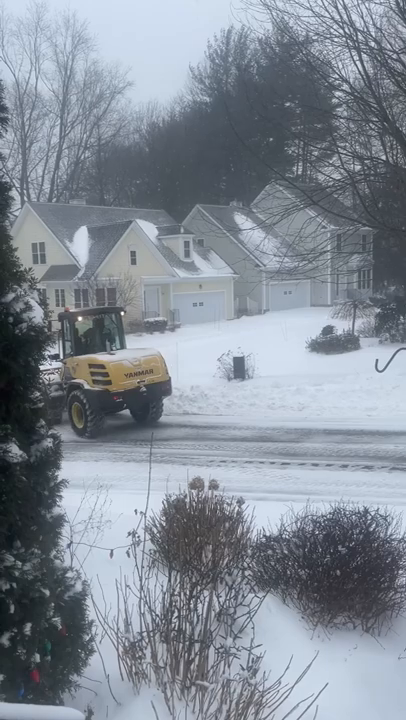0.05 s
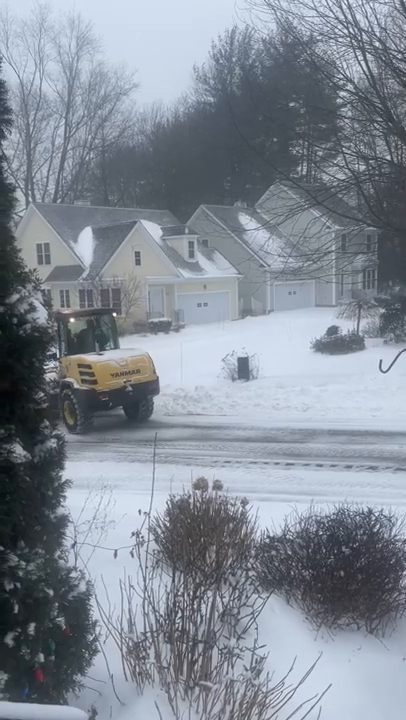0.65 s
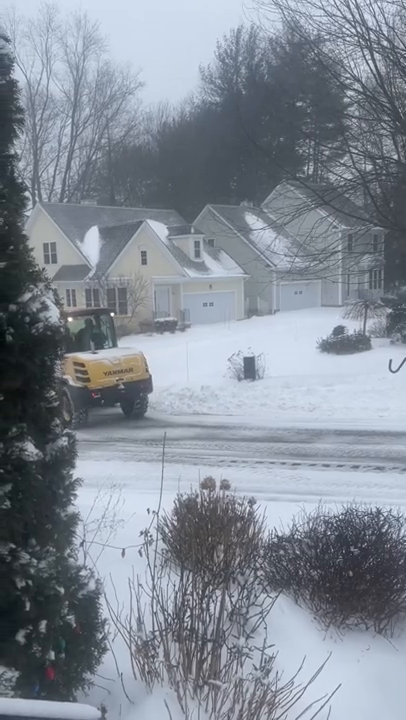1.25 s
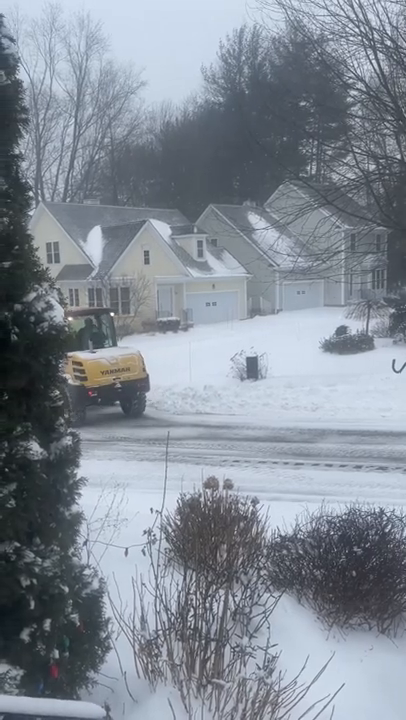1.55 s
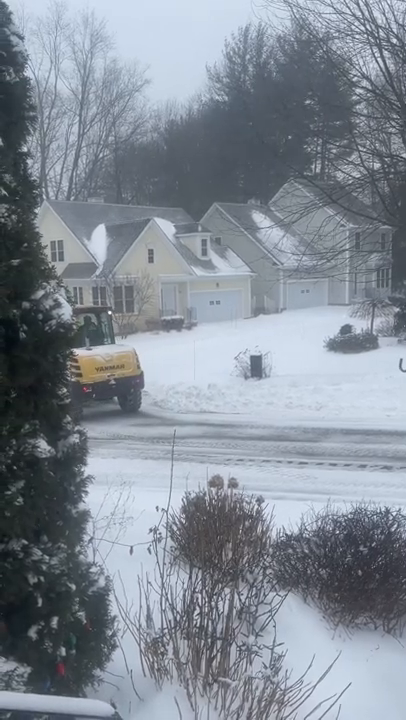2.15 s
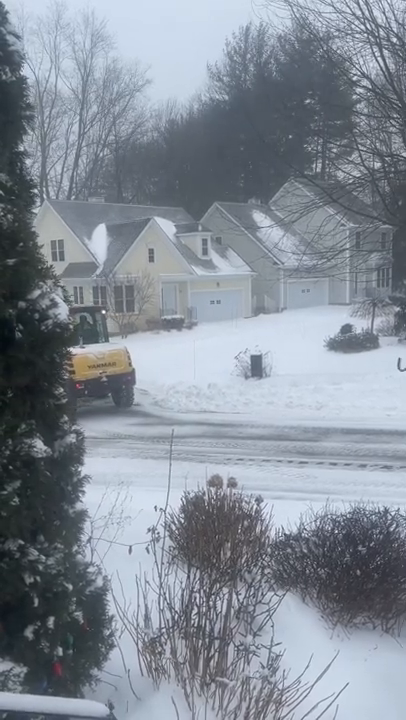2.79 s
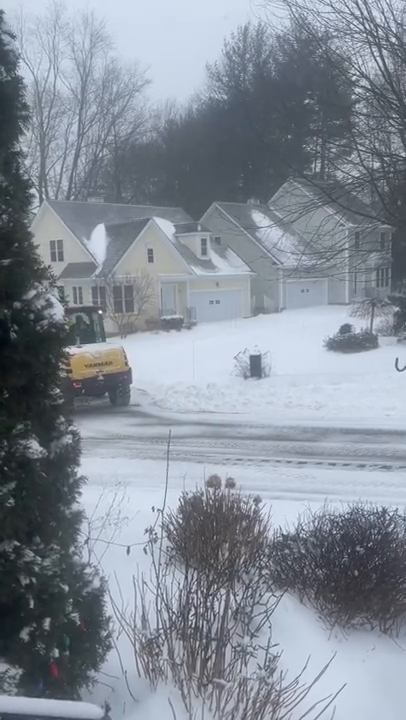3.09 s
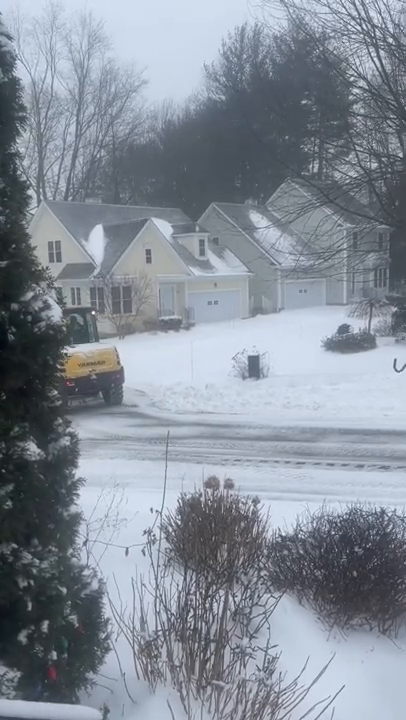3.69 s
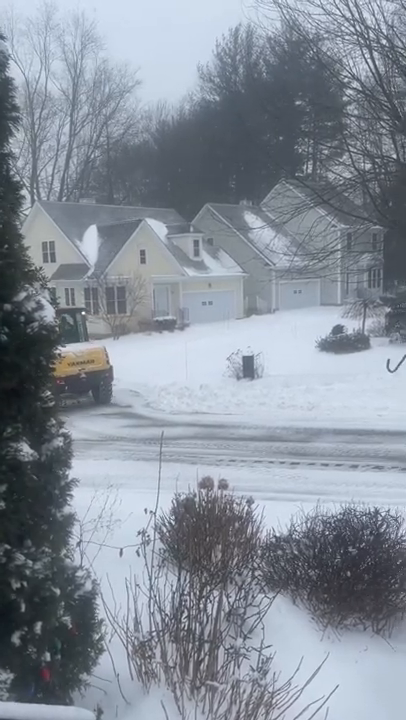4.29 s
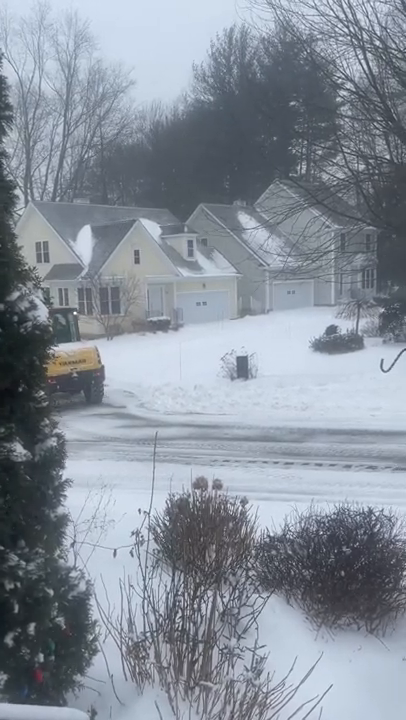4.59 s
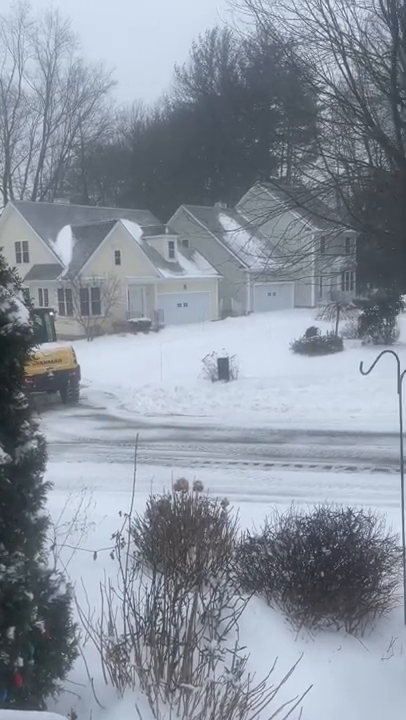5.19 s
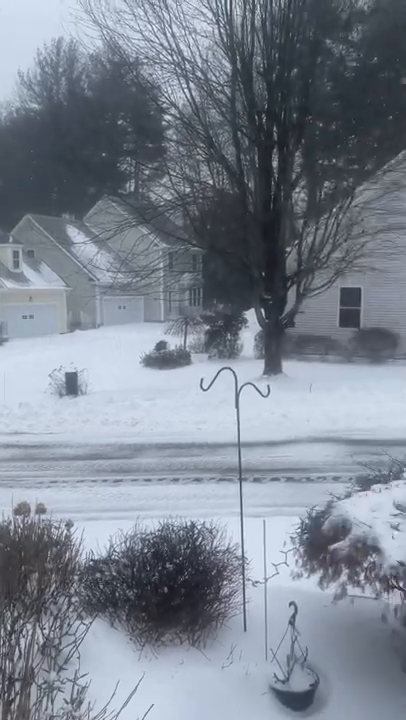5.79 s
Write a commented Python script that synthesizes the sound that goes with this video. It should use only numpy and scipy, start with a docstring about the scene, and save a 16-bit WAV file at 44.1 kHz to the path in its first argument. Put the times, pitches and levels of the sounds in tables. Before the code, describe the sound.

Low diesel rumble with rattling panels, clanks and a faint whine as a loader scrapes snow and slowly recedes.

```python
"""Loader on a snowy street

A wheeled loader works its way along, heard from a house across the front yard. Its four-cylinder
diesel drones and clatters, loose panels rattle, the drive whines, and tyres and blade grind through
snow. The frame bumps and groans, and short notes ring out of the clatter. It moves off behind an
evergreen, which takes the edge off the clatter, while light puffs of air brush the microphone."""
import sys
import numpy as np
from scipy import signal
from scipy.fft import rfft, irfft
from scipy.io import wavfile
from scipy.ndimage import uniform_filter1d, map_coordinates

SR = 44100
rng = np.random.default_rng(int(sys.argv[2]) if len(sys.argv) > 2 else 0)


def unload_wav(signal):
    """Save mono or channel-first audio to the path in sys.argv[1] as 16-bit WAV at rate SR, clipped to [-1, 1]."""
    wavfile.write(
        sys.argv[1],
        SR,
        np.round(np.clip(np.atleast_2d(signal).T, -1, 1) * 32767).astype(np.int16),
    )


N = 266805
TIME = np.arange(N) / SR
FREQS = np.maximum(np.fft.rfftfreq(N, 1 / SR), 1)

# engine revs, pushed up for the shove and sagging as the load comes off: t/s, firing rate/Hz
FIRING_RATE = [(0, 44.4), (.35, 44.85), (.75, 46), (1.2, 46.6), (1.35, 47.9), (1.5, 49.7), (1.7, 48.4),
               (1.95, 48.75), (2.3, 48.1), (2.82, 46.85), (3.1, 47.6), (4.65, 47.35), (5.25, 45.85),
               (5.6, 45.95), (6.05, 46.6)]
# exhaust boom, riding the engine load: t/s, base level/dB
BOOM_LEVEL = [(.08, -37), (1, -32.5), (1.43, -28.5), (1.67, -41), (1.85, -34), (2.15, -37.5), (2.92, -34.5),
              (3.03, -29.5), (3.12, -36.5), (3.22, -32.5), (3.68, -33.5), (3.93, -35.5), (4.05, -33.3),
              (4.2, -35), (4.85, -39.5), (5.1, -42.5), (5.6, -37), (6, -39.5)]
# exhaust overtones: multiple of the firing rate, near base level/dB, far base level/dB, crossfade t/s
OVERTONES = [(1.75, -48, -60, 1.2), (2, -36, -49, 1), (2.5, -50, -53, 1.6), (3, -52, -42, 1.45),
             (4, -59, -54, 1.6), (5, -42.5, -43.2, 1.1), (6, -51, -57, 1.8), (12, -54, -54, 1.6),
             (20, -65, -59, 3.3), (22, -67, -65, 1.6), (28, -67, -62, 1.8)]
# knock of each cylinder in firing order: accent/dB
CYLINDER_ACCENTS = [0.76, -0.81, 0.12, -0.13]
# roar of machine and snow, a row each for rumble, body, clatter and hiss:
# base level/dB, loss per doubling of distance/dB, loss behind the evergreen/dB
ROAR_MIX = [(-38, 3.5, 0.9), (-35, 3.5, 2.5), (-38, 5.5, 1.5), (-52, 11, 1)]
# range in which each of those bands is normalised: low f/Hz, high f/Hz
BAND_CORES = [(60, 200), (280, 900), (1100, 3500), (5300, 8000)]
# crossovers between the bands: f/Hz
BAND_SPLITS = [240, 1000, 4300]
# EQ of the roar in the open (near) and behind the evergreen (far): f/Hz, relative level/dB
NEAR_EQ = [(25, -25), (45, -4), (80, -1), (130, -6), (180, -5), (270, -2.5), (350, -8), (620, -9.5),
           (800, -12), (1400, -16), (2700, -23), (4500, -28), (7500, -39), (10200, -20), (11700, -32.5)]
FAR_EQ = [(25, -11), (45, 1.5), (80, 5.5), (115, 3.5), (180, -3.5), (270, -5.5), (350, -13), (620, -9.5),
          (800, -14.5), (1400, -14.5), (2700, -23.5), (4500, -32.5), (7500, -29.5), (10200, -23),
          (11700, -40.5)]
# peaks and dips in the tone colour of the roar, near and far: f/Hz, width/Hz, gain/dB
NEAR_PEAKS_DIPS = [(123, 23, 11), (477, 34, 3), (650, 65, 7.5), (892, 19, 8), (1007, 19, 7.5),
                   (1960, 320, 4.5), (2850, 70, 2), (3070, 140, 4.5), (4070, 360, 0), (4740, 150, 2),
                   (5700, 660, 11), (7500, 2200, 14), (8600, 2000, -5.5)]
FAR_PEAKS_DIPS = [(217, 12, -4), (250, 45, -1.5), (350, 36, -1.5), (526, 70, -1), (794, 220, -0.5),
                  (962, 42, 9), (1048, 163, -6), (1184, 26, 5), (1360, 140, 2.5), (1760, 80, -3),
                  (1870, 28, 6), (2180, 60, -1), (2300, 120, 4.5), (2366, 90, -3.5), (2540, 63, 6),
                  (2800, 140, 3.5), (3486, 56, 6), (3880, 130, 2), (4800, 150, -3), (5230, 1030, 6),
                  (8900, 2800, -7)]
# the rumble heaves as the tyres churn through deep snow: crest t/s, length/s, gain/dB
SNOW_CHURNS = [(0.097, 0.3, 3), (.82, .2, -1), (1.423, .25, 2.5), (1.753, 0.51, 2.5), (2.66, 0.66, 3),
               (4.002, 0.13, 0)]
# steady whines of the drive: f/Hz, near level/dB, far level/dB
DRIVE_WHINES = [(668, -54, -56), (693, -49, -50.5), (952, -75, -59), (1035, -54, -56), (1324, -70, -63),
                (3058, -61, -77)]
# loose panels, coming and going as the machine turns: f/Hz, width/Hz, level/dB, crest t/s, spread/s
LOOSE_PANELS = [(540, 89, -45.5, 0.13, 0.5), (1223, 48, -51, 0.49, 0.51), (1904, 45, -50, 0.28, 0.51),
                (2620, 53, -55, 0.35, 0.6), (3590, 52, -54, 0.18, 0.43), (1387, 140, -47.5, 1.1, 0.54),
                (1587, 66, -46, 0.81, 0.53), (3110, 120, -54.5, 0.64, 0.67), (3710, 45, -57, 1.05, 0.42),
                (4020, 46, -55.5, 0.83, 0.57), (474, 63, -44.5, 1.7, 0.85), (1317, 64, -50, 2.4, 0.92),
                (2580, 81, -55, 2.9, 1.24), (2820, 72, -56, 4.56, 1.1), (284, 20, -42, 1.37, 0.45),
                (1154, 81, -50, 1.46, .5), (394, 24, -51.5, 3.94, 0.61), (614, 35, -50.5, 4, 1.35),
                (960, 33, -48, 4.33, 0.74), (668, 40, -49.5, 5.7, 0.55), (210, 20, -46.5, 5.74, 0.79),
                (1395, 55, -54, 5.1, .85), (2310, 70, -68, 5.5, 1.1), (2930, 40, -60, 5.4, 1.1)]
# bumps and clanks of blade and frame: t/s, main mode level/dB, f/Hz, T60/s
FRAME_BUMPS = [(.662, -32, 4130, .012), (.942, -29, 3200, .008), (1.002, -21, 400, .008),
               (1.007, -33, 5000, .01), (1.03, -31, 3700, .014), (1.072, -26, 1600, .014),
               (2.309, -29, 148, .08), (2.582, -30, 140, .11), (2.707, -23.3, 720, .016),
               (3.262, -31, 575, .06), (3.379, -30, 390, .16), (3.899, -28.5, 138, .15),
               (3.905, -34, 740, .05)]
# short ringing notes and brief tonal flares in the clatter: t/s, base level/dB, f/Hz, T60/s
RINGING_NOTES = [(.155, -31, 1900, .07), (.212, -36, 2600, .07), (.24, -32, 1005, .1),
                 (.478, -33, 1290, .08), (1.855, -31.5, 976, .12), (1.955, -33, 1320, .16),
                 (2.369, -38, 1850, .07), (2.924, -33, 2600, .07), (2.988, -38, 2570, .07),
                 (4.815, -35.5, 1885, .08), (4.84, -38, 1320, .16), (4.925, -37, 970, .1),
                 (5.315, -39, 1405, .14)]
# low resonances of the frame: f/Hz, width/Hz, relative level/dB
FRAME_MODES = [(95, 40, -3), (150, 45, 1.5), (205, 40, -4), (262, 50, -1), (300, 35, -1)]
# puffs of air on the microphone ports: crest t/s, length/s, level/dB
AIR_PUFFS = [(2.607, .04, -52), (3.302, .03, -53), (3.96, .03, -44), (5.293, .03, -44), (5.75, .4, -60),
             (5.947, .04, -51)]
# stereo width of the roar: f/Hz, left-right correlation
STEREO_LIKENESS = [(100, .9998), (200, .997), (300, .977), (700, .935), (1000, .92), (1500, .96),
                   (2000, .9), (2600, .72), (3500, .89), (4500, .72), (5400, .87), (5900, .995),
                   (6200, .995), (6700, .85), (8000, .88), (9100, .995), (10000, .93), (11000, .72)]
# phase between the two microphone ports: f/Hz, left lead/rad
STEREO_PHASE = [(300, 0), (1500, .1), (2300, .7), (2500, .6), (2680, .15), (2900, .6), (4000, .7),
                (4400, 1.2), (5350, 5.5), (6200, 6.5), (8100, 8.5), (9800, 10.1), (11000, 11.2)]
# balance between the ports: f/Hz, left over right/dB
STEREO_BALANCE = [(400, 0), (1000, .7), (2000, .9), (2550, 3.5), (2800, 0), (4000, 0), (4900, -2.3),
                  (5500, .4), (6500, 0)]


def crank(flutter=0.000968):
    """The engine's clock: a running count of firings, its speed hunting slightly."""
    rate_hz = over_time(FIRING_RATE)
    return np.cumsum(rate_hz * (1 + flutter * drift(8))) / SR


def exhaust(firings, far, boom_trim_db=0.1, overtone_trim_db=-0.6, throb=0.094):
    """A boom throbbing with the uneven cylinders, under overtones that shift as the pipe turns away."""
    boom = from_db(over_time(BOOM_LEVEL) + boom_trim_db) * np.sqrt(2) * np.sin(2 * np.pi * firings)
    out = boom * (1 + throb * tone(firings / len(CYLINDER_ACCENTS)))
    # the engine eases off, then picks up part of the way
    effort_db = overtone_trim_db - 11 * onset(5.06, blur_s=.056) + 6.5 * onset(5.7, blur_s=.056)
    for order, near_db, far_db, turn_s in OVERTONES:
        turned = onset(turn_s, blur_s=.15)
        level = from_db(near_db) * (1 - turned) + from_db(far_db) * turned
        waver_db = (1.8 - far) * drift(4)
        out = out + level * from_db(effort_db + waver_db) * tone(order * firings)
    return out


def knocks(firings, scatter_db=0.88, decay_firings=.65):
    """Diesel knock envelope, rms 1: every firing kicks it up and it decays until the next."""
    count = firings.astype(int)
    strength_db = np.array(CYLINDER_ACCENTS)[count % 4] + scatter_db * rng.standard_normal(512)[count]
    burst = from_db(strength_db) * np.exp(-(firings % 1) / decay_firings)
    burst = uniform_filter1d(burst, size=140)  # rounds off the attack
    return burst / np.sqrt(np.mean(burst ** 2))


def valve_train(firings, size=3750):
    """A hash of small impacts: noise looping every four firings, giving a dense comb of lines."""
    loop = rng.standard_normal(size)
    position = firings / len(CYLINDER_ACCENTS) % 1 * size
    return map_coordinates(loop, [position], order=3, mode="grid-wrap")


def roar(firings, far, band_pulsing=(.1, .2, .5, .14), far_pulsing=0.39, grind_db=0.73):
    """Tyres and blade grind steadily; diesel knock pulses on top, blurring with distance."""
    knock = knocks(firings)
    near_bands = roar_bands(firings, NEAR_EQ, NEAR_PEAKS_DIPS)
    far_bands = roar_bands(firings, FAR_EQ, FAR_PEAKS_DIPS)
    levels_db = roar_levels(far)
    out = 0
    for near_band, far_band, level_db, depth in zip(near_bands, far_bands, levels_db, band_pulsing):
        band = np.sqrt(1 - far) * near_band + np.sqrt(far) * far_band
        knock_share = depth * (1 - far + far * far_pulsing)
        pulse = np.sqrt(1 - knock_share + knock_share * knock ** 2)
        out = out + band * pulse * from_db(level_db + grind_db * drift(14))
    return out


def roar_bands(firings, eq, peaks_dips, valve_share=0.42, valves_from_hz=350, low_cut_hz=32):
    """Stereo noise and valve train, coloured by EQ and split into rumble, body, clatter and hiss."""
    lift_db = sum(db * peak(hz, width) for hz, width, db in peaks_dips)
    colour = from_db(over_hz(eq) + lift_db) / np.sqrt(1 + (low_cut_hz / FREQS) ** 12)
    mid, side = rfft(rng.standard_normal((2, N)))
    share = valve_share / (1 + (valves_from_hz / FREQS) ** 2)
    mid = np.sqrt(1 - share) * mid + np.sqrt(share) * rfft(valve_train(firings))
    alike = over_hz(STEREO_LIKENESS)
    spectrum = colour * (np.sqrt((1 + alike) / 2) * mid + np.sqrt((1 - alike) / 2) * side * [[1], [-1]])
    lowpasses = [0] + [1 / (1 + (FREQS / hz) ** 6) for hz in BAND_SPLITS] + [1]
    bands = []
    for k, (low, high) in enumerate(BAND_CORES):
        core_rms = np.sqrt(np.mean(colour ** 2 * (FREQS > low) * (FREQS < high)))
        bands.append(irfft(spectrum * (lowpasses[k + 1] - lowpasses[k]), N) / core_rms)
    return bands


def roar_levels(far, start_m=22.3, away_m_per_s=3.14, swing_clatter_db=1, swing_hiss_db=4):
    """Fader rides in dB: all four bands sink with distance and cover; churning snow moves the rumble."""
    doublings = np.log2(1 + away_m_per_s * TIME / start_m)
    rumble, body, clatter, hiss = [db - distance_db * doublings - cover_db * far
                                   for db, distance_db, cover_db in ROAR_MIX]
    churn_db = sum(db * swell(s, length / 2, length / 2) for s, length, db in SNOW_CHURNS)
    swing = onset(5.6, blur_s=.1)  # the microphone swings round and the treble opens
    return rumble + churn_db, body, clatter + swing_clatter_db * swing, hiss + swing_hiss_db * swing


def drive(firings, far, pistons=9, idle_db=-55, loaded_db=-46.5, waver_db=1.5, smear_cycles=0.29):
    """The hydraulic pump follows the crank and swells under load; the other whines hold their pitch."""
    pump_db = idle_db + (loaded_db - idle_db) * onset(3.55, blur_s=.19)
    out = from_db(pump_db + waver_db / 2 * drift(3.3)) * tone(pistons * firings)
    for hz, near_db, far_db in DRIVE_WHINES:
        level_db = near_db + (far_db - near_db) * far + waver_db * drift(3.9)
        out = out + from_db(level_db) * tone(hz * TIME + smear_cycles * drift(7))
    return out


def rattle(firings, far, taps_per_s=450, tightness=2.5, scatter_db=1.5):
    """Loose panels chatter on their fixings, mostly just after a firing, each while it faces the house."""
    shake = knocks(firings) ** (tightness * (1 - far / 2))
    chance = taps_per_s / SR * shake / shake.mean()
    out = 0
    for hz, width, level_db, crest_s, spread_s in LOOSE_PANELS:
        hit = rng.random(N) < chance
        strength, polarity = rng.standard_normal((2, 8192))[:, np.arange(hit.sum()) % 8192]
        taps = np.zeros(N)
        taps[hit] = np.sign(polarity) * from_db(scatter_db * strength)
        pole = np.exp(-np.pi * width / SR)
        feedback = [1, -2 * pole * np.cos(2 * np.pi * hz / SR), pole * pole]
        ring = signal.lfilter([1, 0, -1], feedback, taps)
        out = out + from_db(level_db) * swell(crest_s, spread_s, spread_s) * ring / np.std(ring)
    return out


def bumps(upper_ratio=1.6, upper_db=-10):
    """Each jolt rings a panel in one main mode and a weaker upper one that dies away with it."""
    out = np.zeros(N)
    for s, level_db, hz, t60 in FRAME_BUMPS:
        start = int(s * SR)
        age = TIME[:min(SR // 2, N - start)]
        fade = from_db(-60 * age / t60)
        phase = 2 * np.pi * hz * age
        upper = from_db(upper_db) * fade * np.sin(upper_ratio * phase)
        out[start:start + len(age)] += from_db(level_db) * fade * (np.sin(phase) + upper)
    return out


def ringing_notes(attack_s=.004, buzz_db=2.5):
    """Short notes and tonal flares in the clatter: decaying sines roughened by a fast level flicker."""
    out = 0
    for s, level_db, hz, t60 in RINGING_NOTES:
        age = np.maximum(TIME - s, 0)
        envelope = np.minimum(age / attack_s, 1) * from_db(-60 * np.minimum(age / t60, 2))
        out = out + from_db(level_db) * envelope * np.sin(2 * np.pi * hz * age)
    return out * from_db(buzz_db * drift(120))


def groan(level_db=-35):
    """Rough dragging shakes the low modes of the frame once, as the machine takes up load."""
    response = sum(from_db(db) * peak(hz, width) for hz, width, db in FRAME_MODES)
    shake = irfft(rfft(rng.standard_normal(N)) * response, N)
    return from_db(level_db) * swell(1.75, rise_s=.27, fall_s=.13) * shake / np.std(shake)


def puffs(band_hz=(50, 200)):
    """Light air brushes the microphone ports: soft low thuds, different in each ear."""
    bandpass = signal.butter(1, band_hz, "band", fs=SR, output="sos")
    air = signal.sosfilt(bandpass, rng.standard_normal((2, N)))
    envelope = sum(from_db(db) * swell(s, length / 2, length / 2) for s, length, db in AIR_PUFFS)
    return envelope * air / np.std(air)


def from_db(db):
    """Decibels to gain."""
    return 10 ** (np.asarray(db) / 20)


def over_time(points):
    """Automation curve: breakpoints joined by straight lines, sample by sample."""
    s, value = np.transpose(points)
    return np.interp(TIME, s, value)


def over_hz(points):
    """Breakpoints joined by straight lines over log frequency."""
    hz, value = np.transpose(points)
    return np.interp(np.log(FREQS), np.log(hz), value)


def peak(hz, width_hz):
    """Spectral peak of height 1."""
    return 1 / (1 + (2 * (FREQS - hz) / width_hz) ** 2)


def drift(rate_hz):
    """Smooth random wander with a spread of about 1."""
    knots = rng.standard_normal(2048)
    return map_coordinates(knots, [TIME * rate_hz * 2 + 2], order=2, mode="wrap")


def tone(cycles):
    """Sine of rms 1 with a random start phase."""
    return np.sqrt(2) * np.sin(2 * np.pi * (cycles + rng.random()))


def onset(at_s, blur_s):
    """Smooth fade from 0 to 1, half way at the given time."""
    return .5 + .5 * np.tanh((TIME - at_s) / (2 * blur_s))


def swell(at_s, rise_s, fall_s):
    """Bell envelope of height 1 with its own rise and fall."""
    return np.exp(-((TIME - at_s) / np.where(TIME < at_s, rise_s, fall_s)) ** 2)


def scene():
    """The crank times exhaust, pump, clatter and rattle; frame noises, notes and puffs come on top."""
    firings = crank()
    far = onset(1.58, blur_s=.2)  # 0 in the open, 1 behind the evergreen
    machine = exhaust(firings, far) + drive(firings, far) + roar(firings, far) + rattle(firings, far)
    return machine + groan() + bumps() + ringing_notes() + puffs()


def record(dry, fade_s=.005, cutoff_hz=11500):
    """Soft ends, phase and level differences between the two ports, and a steep top cut."""
    fades = np.minimum(np.minimum(TIME, TIME[::-1]) / fade_s, 1)
    lean = from_db(over_hz(STEREO_BALANCE) / 2)
    ports = np.array([lean, np.exp(-1j * over_hz(STEREO_PHASE)) / lean])
    stereo = irfft(rfft(dry * fades) * ports, N)
    top_cut = signal.ellip(12, .1, 80, cutoff_hz, fs=SR, output="sos")
    return signal.sosfilt(top_cut, stereo)


dry = scene()
out = record(dry)
unload_wav(out)
```